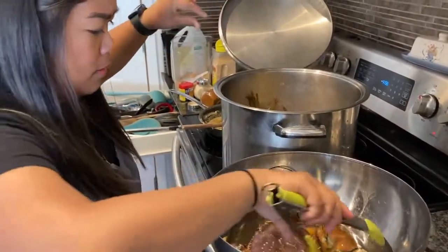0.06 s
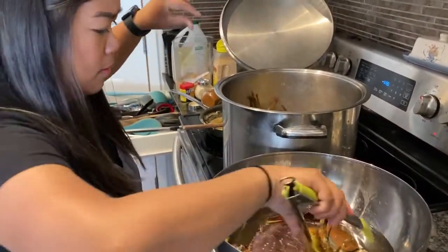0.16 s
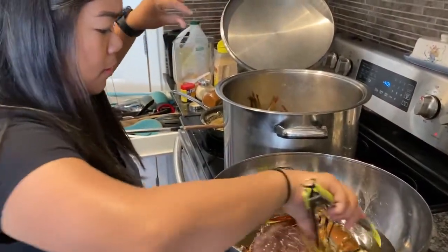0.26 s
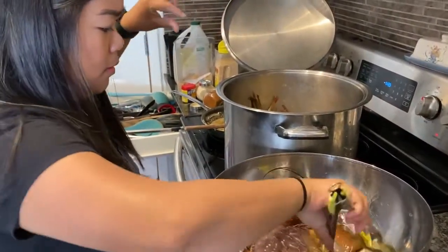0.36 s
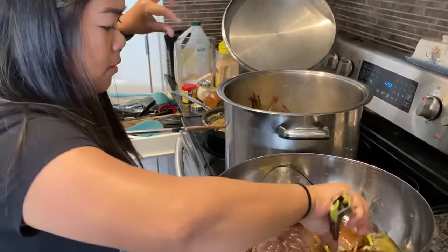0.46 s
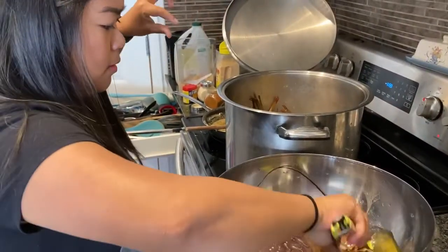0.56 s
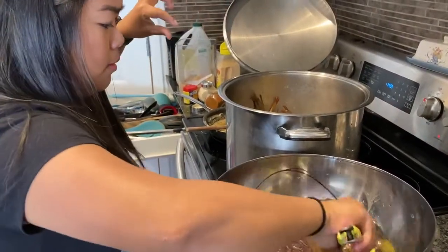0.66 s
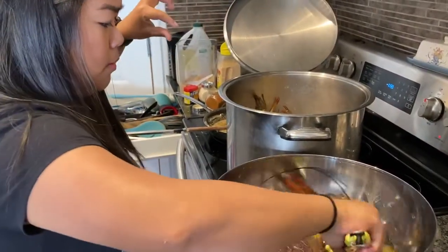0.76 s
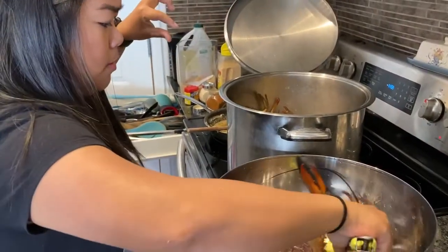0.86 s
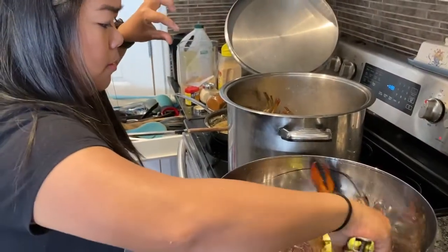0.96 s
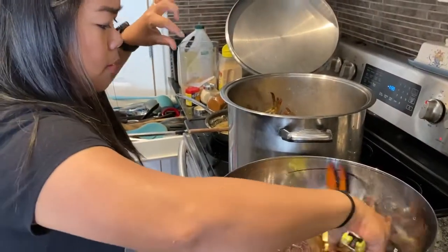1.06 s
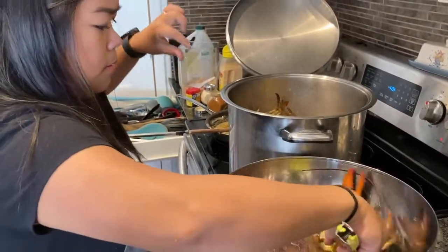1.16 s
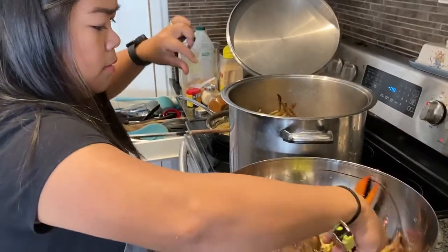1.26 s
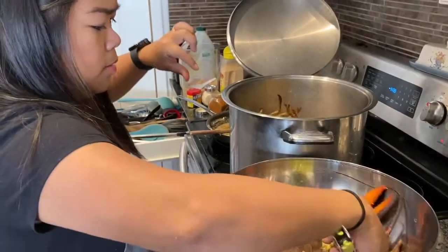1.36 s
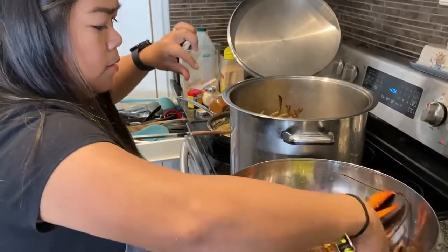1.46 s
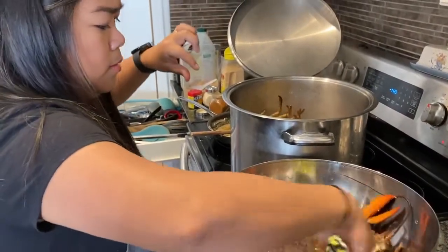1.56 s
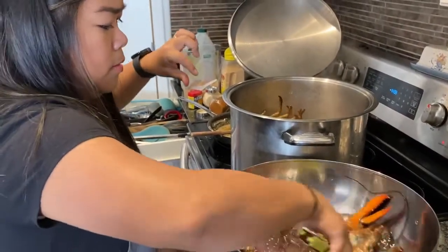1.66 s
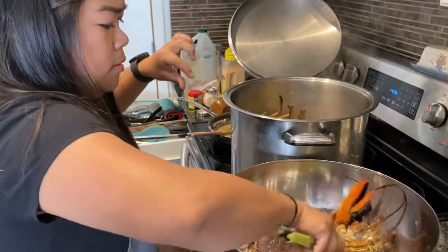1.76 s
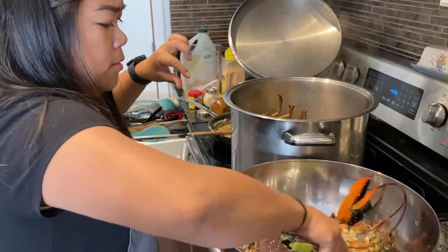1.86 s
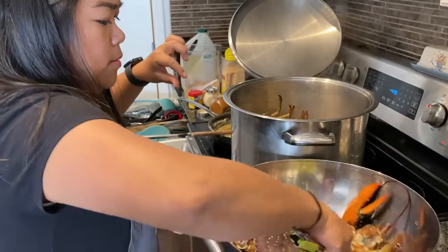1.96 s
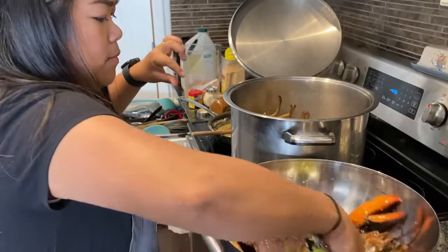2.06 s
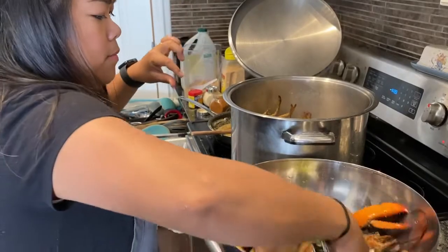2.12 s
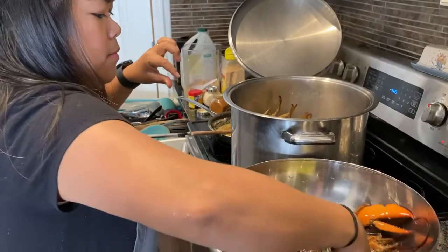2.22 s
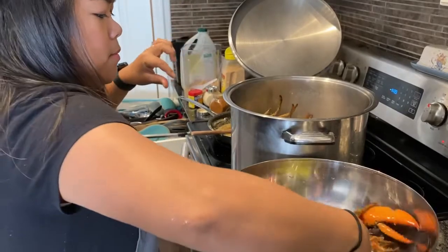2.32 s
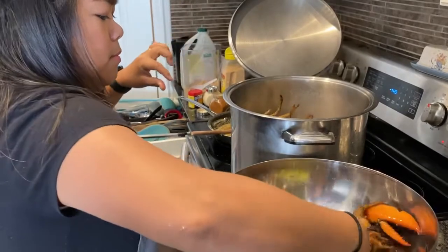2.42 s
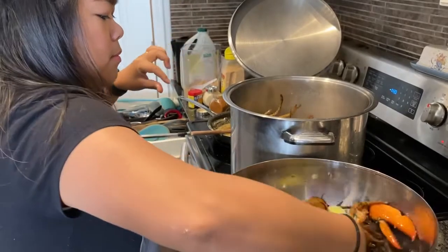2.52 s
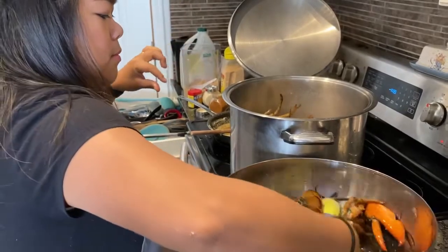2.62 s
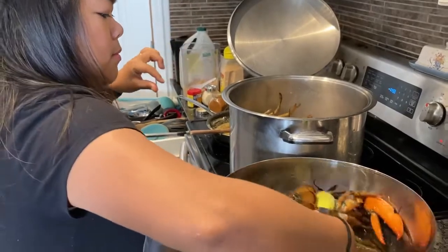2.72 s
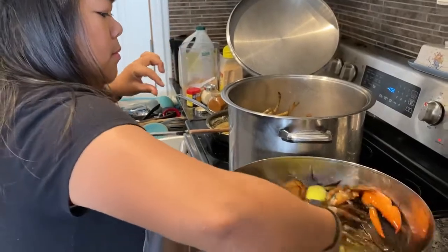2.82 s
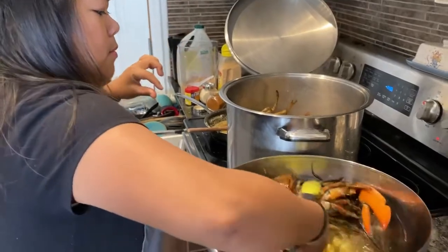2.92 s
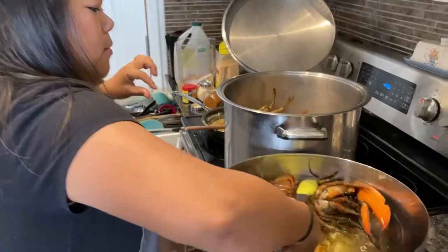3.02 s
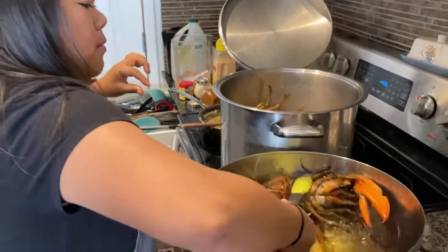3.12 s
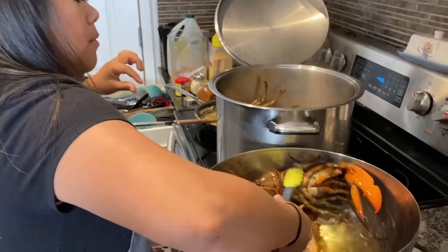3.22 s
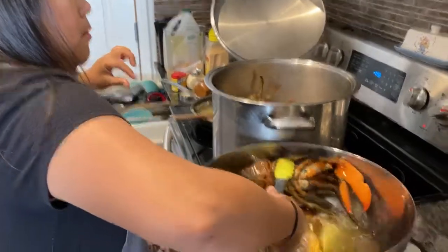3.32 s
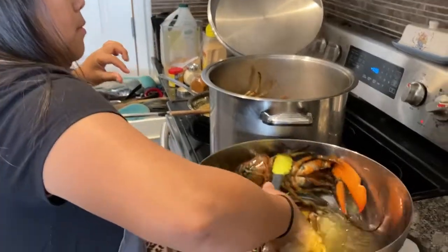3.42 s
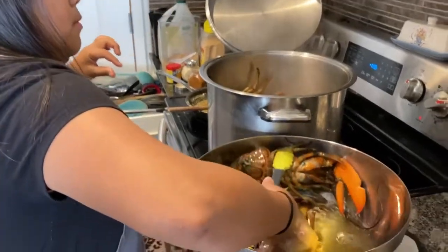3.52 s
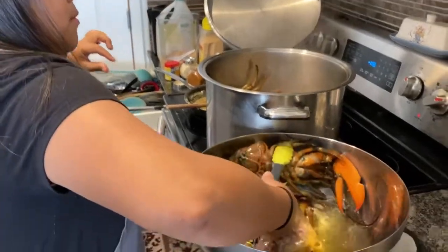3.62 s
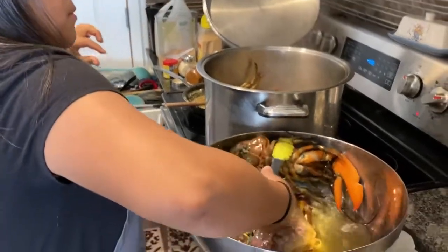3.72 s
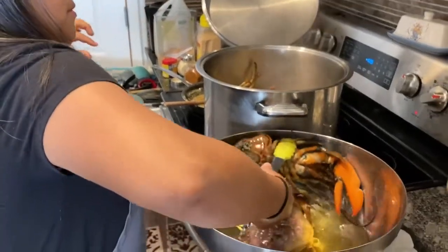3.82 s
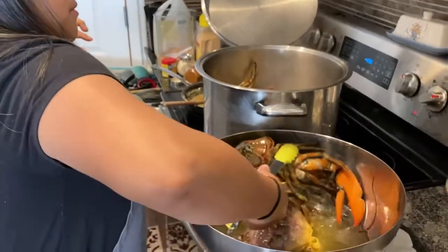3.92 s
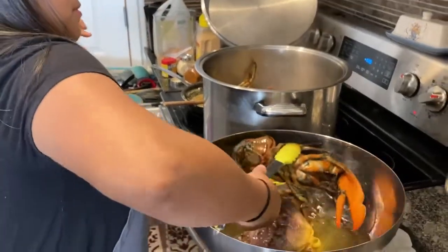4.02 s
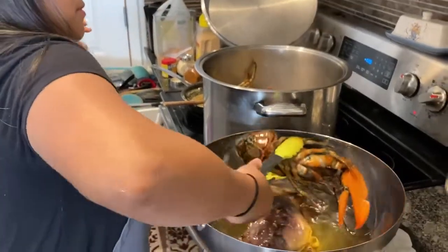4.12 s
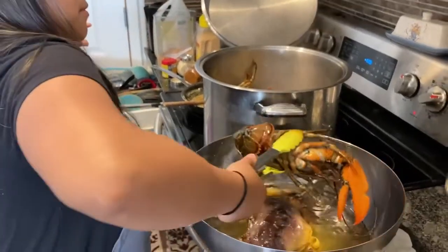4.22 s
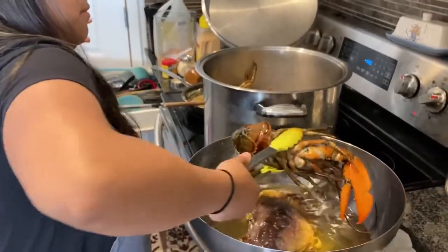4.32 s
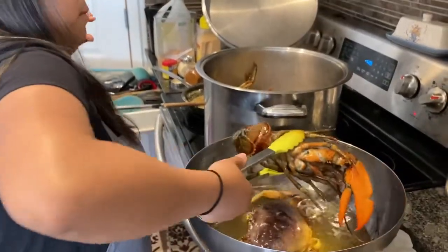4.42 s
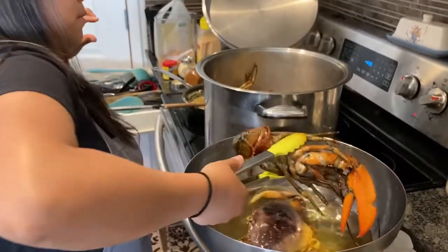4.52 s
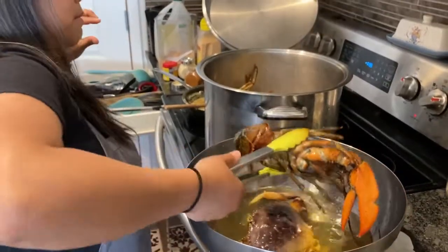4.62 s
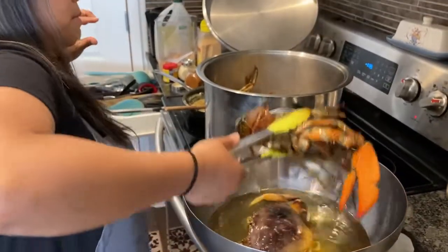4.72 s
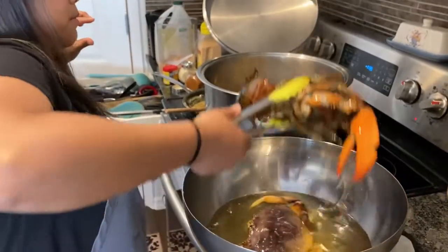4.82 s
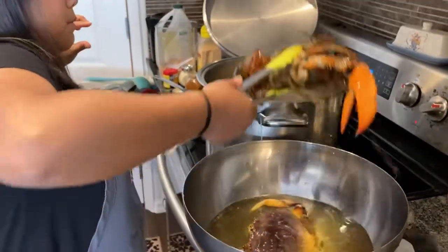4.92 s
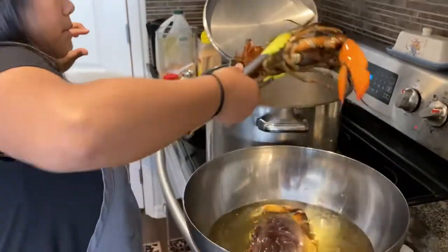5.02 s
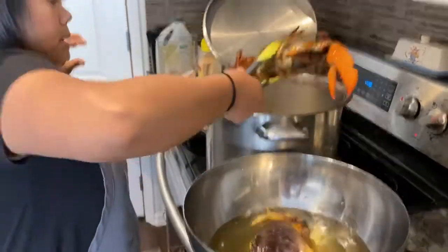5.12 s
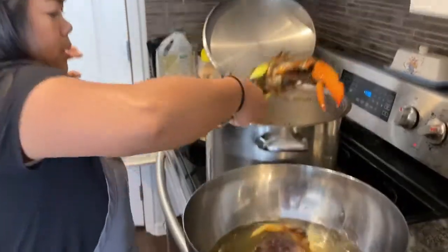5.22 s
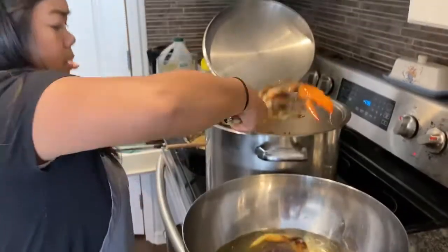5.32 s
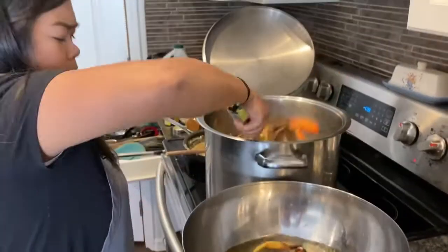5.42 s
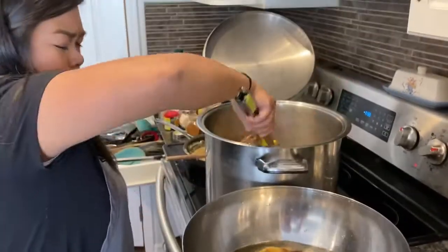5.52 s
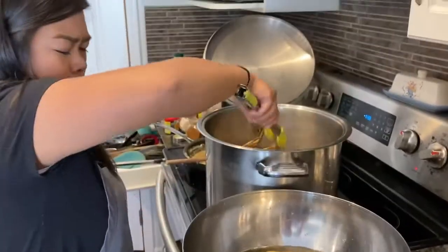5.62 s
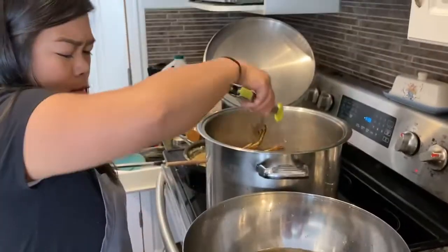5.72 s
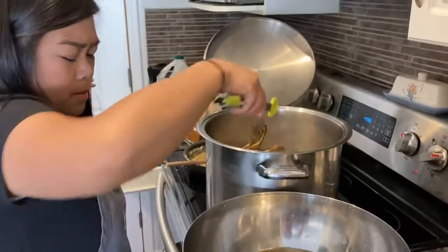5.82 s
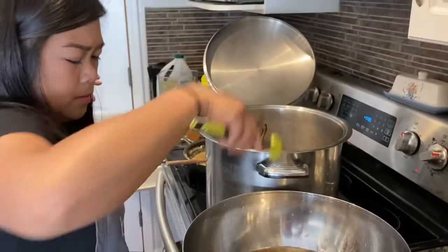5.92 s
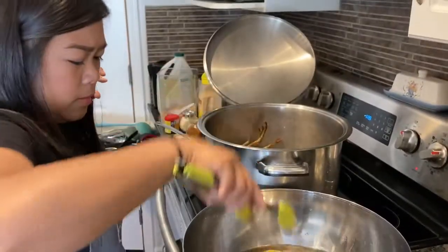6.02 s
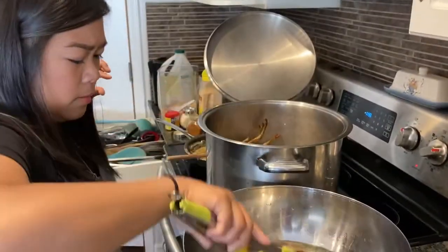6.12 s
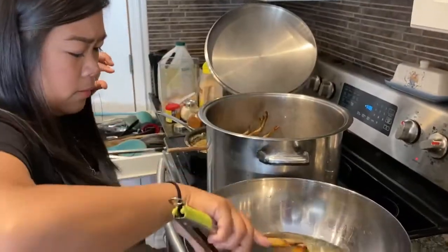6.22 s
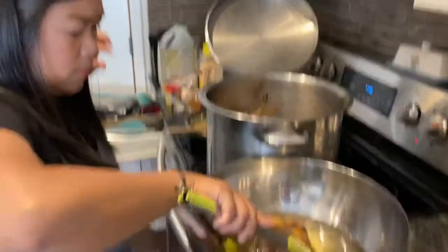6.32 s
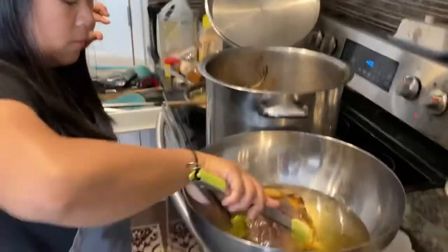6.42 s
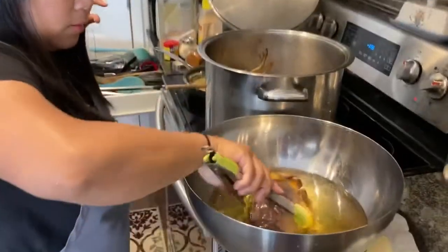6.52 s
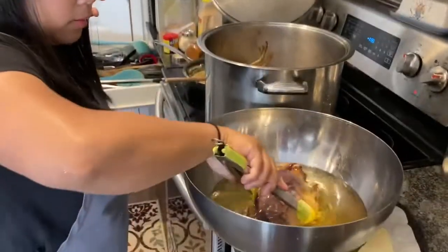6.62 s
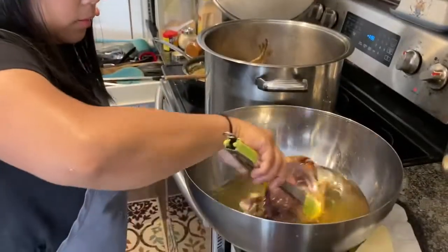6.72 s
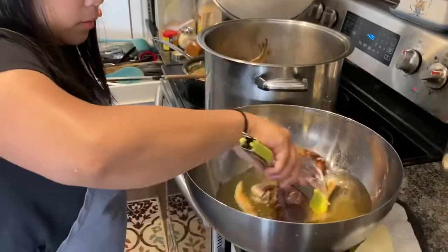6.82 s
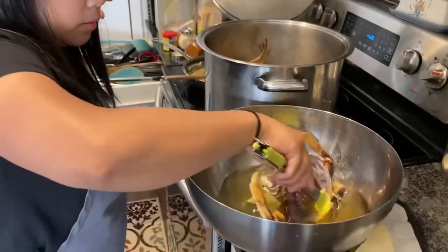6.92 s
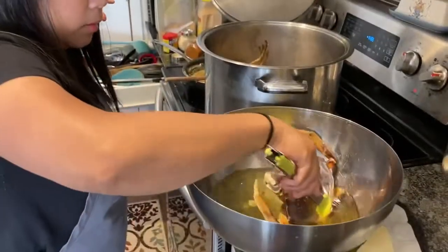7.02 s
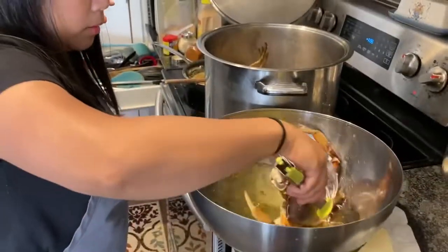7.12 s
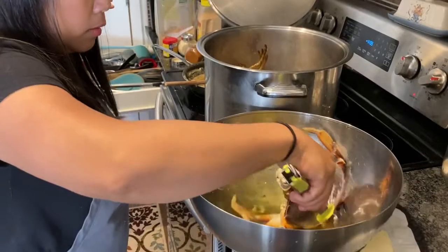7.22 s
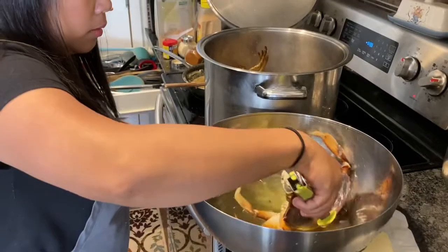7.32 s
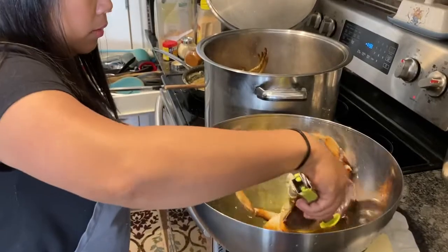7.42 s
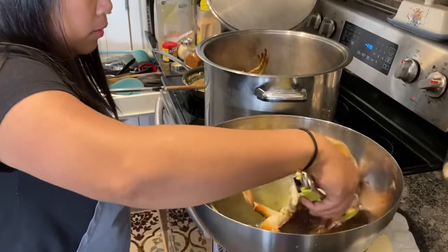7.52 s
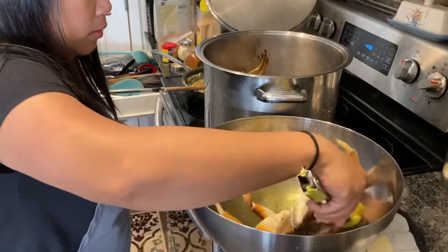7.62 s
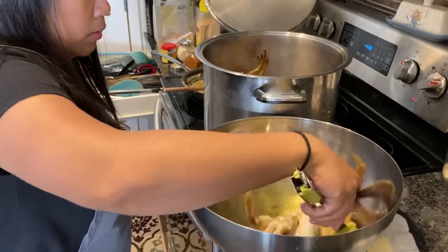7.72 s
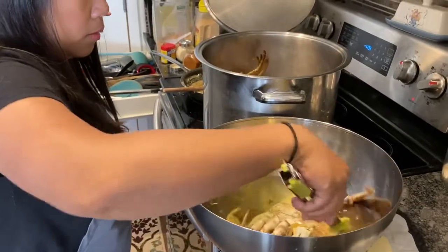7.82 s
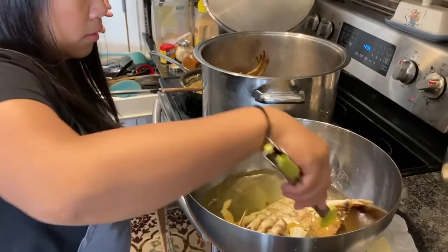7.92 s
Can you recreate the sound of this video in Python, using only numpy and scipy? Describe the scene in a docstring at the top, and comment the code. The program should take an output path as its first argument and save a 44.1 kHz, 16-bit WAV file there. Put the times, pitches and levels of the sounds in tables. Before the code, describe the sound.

A small kitchen heard close by in stereo, with a faint steady low appliance hum and short reflections from the walls. From 0 to 3.6 s tongs and hard crab shells tick, rub and knock on a wet steel bowl: a sharp clack near 0.2 s, swishing scrapes around 1.6, 2.0 and 2.5 s, and a denser clatter at 2.5-2.9 s, with shallow water sloshing and gurgling. The movement dies away; from 3.7 to 4.3 s drops plink brightly into the water, with a few more fine drips until 5 s. At 5.2-5.5 s the crab tumbles into a tall pot, a hollow ringing metal clatter with scraping. It is almost quiet, with tiny drips, until 6.3 s. Then scraping and clacking return in the bowl, loudest at 7.4-7.5 s, with another harsh scrape and glugging knocks at 7.6-7.8 s.

```python
"""Over a low appliance hum, tongs and hard shells clack and rub on a steel bowl.
A kitchen, close to a phone with two microphone ports; shallow water sloshes and gurgles in the bowl.
One shell is lifted, drips, and tumbles into a tall pot; then the chase round the bowl resumes.
Rubbing, water and hum are shaped noise and damped grains; knocks are noise bursts ringing steel modes.
Drops and glugs are gliding tones. The walls answer knocks and water briefly."""
import sys
import numpy as np
from scipy import signal
from scipy.fft import rfft, irfft, next_fast_len
from scipy.io import wavfile
from scipy.ndimage import uniform_filter1d

SR = 44100
rng = np.random.default_rng(int(sys.argv[2]) if len(sys.argv) > 2 else 0)


def master(y):
    """Save y as 16-bit WAV."""
    cut = np.clip(np.atleast_2d(y).T, -1, 1)
    pcm = np.round(cut * 32767)  # scale
    wavfile.write(sys.argv[1], SR, pcm.astype(np.int16))


N = 351036  # samples


def amp(db):
    """Gain of a level in dB."""
    return 10 ** (np.asarray(db) / 20)


def unit(x):
    """x at rms 1."""
    return x / np.sqrt(np.mean(x ** 2) + 1e-20)


def noise(n):
    """White noise, n samples."""
    return rng.standard_normal(n)


def flutter(n, size):
    """Slow random movement of rms 1: noise averaged over size samples."""
    return unit(uniform_filter1d(noise(n), size=size))


def onset(t, rise_s):
    """Exponential rise from 0 to 1."""
    return 1 - np.exp(-t / rise_s)


def along(points, hz):
    """Interpolates (frequency [Hz], value) points on a log frequency axis."""
    f, v = np.transpose(points)
    return np.interp(np.log(hz + 1), np.log(f + 1), v)


def curves(rows):
    """One value per sample for each column after the time."""
    s, *cols = np.transpose(rows)
    return [np.interp(np.arange(N) / SR, s, c) for c in cols]


def law(usual_db, slope, over_db):
    """Level of a layer whose control stands over_db above its usual value."""
    return usual_db + slope * over_db


def filtered(x, response):
    """x times a complex response of frequency."""
    n = x.shape[-1]
    m = next_fast_len(n + 4096)
    return irfft(rfft(x, m) * response(np.fft.rfftfreq(m, 1 / SR)), m)[..., :n]


def band(hz, centre_hz, width_hz):
    """A causal resonance, gain 1 at its centre."""
    return 1j * hz * width_hz / (centre_hz ** 2 - hz ** 2 + 1j * hz * width_hz)


def add(track, s, sound, pan_db):
    """Lays a sound into a stereo track at s seconds, the left louder by pan_db."""
    part = track[:, round(s * SR):][:, :sound.shape[-1]]
    part += sound[..., :part.shape[1]] * amp([[pan_db / 2], [-pan_db / 2]])


# how alike the two ports hear diffuse sound: (frequency [Hz], likeness [0-1])
LIKENESS = [(100, 0.98), (350, 0.81), (700, 0.036), (1300, 0.14), (3000, 0.11), (5000, 0.05)]


def stereo_angle(hz):
    """Mixing angle between mid and side noise that gives the likeness of the ports."""
    return np.arccos(np.clip(along(LIKENESS, hz), -1, 1)) / 2


def rush(spectrum, patchy_db, grit_db):
    """Stereo noise of rms 1 with random patches in time and pitch; grit makes millisecond lumps."""
    z = signal.stft(rng.standard_normal((2, N)), nperseg=256)[2]
    field = uniform_filter1d(rng.standard_normal(z.shape[1:]), size=4, axis=0)
    field = unit(uniform_filter1d(field, size=10, axis=1))
    pair = signal.istft(z * amp(patchy_db * field), nperseg=256)[1][:, :N]
    pair = pair * amp(grit_db * flutter(N, 120))

    def colour(hz):
        angle = stereo_angle(hz)
        return amp(along(spectrum, hz)) * [np.cos(angle), np.sin(angle)]

    mid, side = filtered(pair, colour)
    return unit(np.array([mid + side, mid - side]))


def crackle(count, centre_hz, spread, cycles, uneven_db):
    """Scattered short damped tones of rms 1: legs ticking and small bubbles bursting."""
    when, pitch, size, side = rng.random((count, 4)).T
    hz = centre_hz * np.exp(spread * (2 * pitch - 1))[:, None]
    k = np.arange(SR // 50)
    tones = np.sin(2 * np.pi * hz * k / SR) * np.exp(-hz * k / SR / cycles)
    grains = amp(-uneven_db * np.log(size + 0.007))[:, None] * tones
    index = ((when * N).astype(int)[:, None] + k).ravel()
    ports = [np.bincount(index, (grains * (0.65 + gain)[:, None]).ravel(), N)[:N]
             for gain in (side, 1 - side)]
    return unit(np.array(ports))


# colour of the appliance: (frequency [Hz], density [dB per Hz])
HUM_COLOUR = [(25, -16.5), (60, 2.5), (150, 2), (260, 1), (340, 0.5), (450, -15.5), (700, -5.5),
              (1200, -17.5), (3000, -27), (8000, -43.5), (15500, -46.5)]


def hum():
    """A low appliance hum: steady noise, strongest between about 60 and 340 Hz."""
    return amp(-64.5) * rush(HUM_COLOUR, patchy_db=1.0, grit_db=-2.0)


# shells dragged over wet steel: (time [s], rubbing [dB], stirring of the water [dB])
DRAG_MOVES = [(0, -78, -66), (.16, -78, -63.5), (.29, -55, -57), (.5, -61, -59.5), (.62, -56.5, -63.5),
              (.75, -63, -70), (.93, -68.5, -61.5), (1.0, -53, -59.5), (1.14, -58.5, -57),
              (1.3, -57, -56.5), (1.46, -68.5, -66.5), (1.57, -48, -49), (1.68, -60, -60),
              (1.85, -60.5, -58.5), (1.99, -46.5, -58.5), (2.14, -70, -67.5), (2.31, -70, -63.5),
              (2.44, -52, -55), (2.56, -45, -56.5), (2.66, -52.5, -50.5), (2.83, -42.5, -47),
              (2.94, -60.5, -57.5), (3.07, -61, -58), (3.28, -59.5, -61.5), (3.44, -71, -65.5),
              (3.65, -83, -63), (3.92, -83, -74.5), (4.2, -75, -73.5), (4.41, -79, -63), (4.51, -88, -80),
              (4.92, -84, -81), (5.1, -103, -66), (5.26, -49, -59.5), (5.38, -32.5, -48.5),
              (5.58, -46.5, -49), (5.75, -64.5, -60), (6.06, -75.5, -75.5), (6.28, -101.5, -63.5),
              (6.32, -55, -50), (6.46, -59, -64), (6.64, -53.5, -58), (6.82, -64, -60.5), (7.0, -47, -60.5),
              (7.15, -48, -62), (7.3, -60, -63), (7.41, -36.5, -46.5), (7.54, -41, -50),
              (7.68, -31.5, -49.5), (7.8, -45, -49.5), (7.96, -55, -54)]
# slow changes of the mix, added to the laws:
# (time [s], thin legs on the steel [dB], air under the shells [dB], weight on the bowl [dB])
DRAG_MIX = [(0, 7, 10.5, 3), (.3, -5, 4, 9.5), (.55, -0.5, 1, -1.5), (.8, 0, 2, 1), (1.1, 6, 5, 1.5),
            (1.35, -1.5, -5, 0), (2.0, -1, -10, 1.5), (2.3, 5, -19, -5), (2.45, 0, 15, 3),
            (2.62, -4.5, 4, 1), (2.8, -7, -3, -9), (3.0, 4.5, 12, 0), (3.3, -0.5, 10, -1.5),
            (3.7, 12, 7.5, 2.5), (4.1, -6, 1, -0.5), (5.2, -16.5, 1.5, 1), (5.8, -19.5, -5, 2),
            (6.3, -9, -5, -1.5), (6.7, -5, 9, 1.5), (7.1, -6, -1, -3), (7.5, -1, 6, -4),
            (7.96, -5.5, -7, 3.5)]
# colours of the rubbing, the water, and the finest treble: (frequency [Hz], density [dB per Hz])
SCRAPE_COLOUR = [(1500, -21.5), (2300, -3.5), (3200, 1), (4200, -4.5), (6000, -7.5), (8000, -14)]
SLOSH_COLOUR = [(600, -17), (950, -23.5), (1300, -13.5), (2200, -15), (3200, -36)]
SIZZLE_COLOUR = [(6500, -24.5), (8000, -23), (11000, -8), (14000, -28.5), (16000, -17.5)]
# thin legs skating: (frequency [Hz], density [dB per Hz])
HISS_COLOUR = [(3300, -31), (4100, -7.5), (4800, 2), (5400, -5), (6500, -3), (8000, -10.5), (9500, -36.5)]
# air under the shells in the water: (frequency [Hz], density [dB per Hz])
GURGLE_COLOUR = [(400, -17.5), (560, -5.5), (700, 11), (820, 11), (1000, -9.5), (1300, -6.5), (1700, -25)]
# the bowl shifting on the counter: (frequency [Hz], density [dB per Hz])
ROCK_COLOUR = [(25, -24.5), (50, 3.5), (130, -6.5), (220, 4), (320, -0.5), (450, -8), (600, -29.5)]


def drag():
    """Legs and tongs rub the steel, stir the water and rock the bowl; each layer follows by its own law."""
    rub, stir = np.array(curves(DRAG_MOVES)) + 60  # dB over a middling movement at -60 dB
    legs, air, weight = curves(DRAG_MIX)
    scrape_db = law(-63.5, 0.83, rub)
    hiss_db = law(-61.5, 0.86, rub) + legs
    sizzle_db = law(-68.5, 0.49, rub)
    slosh_db = law(-63.5, 1.32, stir)
    gurgle_db = law(-70, 0.61, stir) + air
    rock_db = law(-62, 0.43, stir) + weight
    bubbles = crackle(count=2600, centre_hz=1100, spread=0.75, cycles=5.4, uneven_db=4.0)
    leg_ticks = crackle(count=2600, centre_hz=4080, spread=0.628, cycles=6, uneven_db=2.4)
    return (amp(scrape_db) * rush(SCRAPE_COLOUR, patchy_db=5.0, grit_db=0.0)
            + amp(hiss_db) * rush(HISS_COLOUR, patchy_db=4.5, grit_db=0.5)
            + amp(slosh_db) * rush(SLOSH_COLOUR, patchy_db=2.5, grit_db=-0.5)
            + amp(sizzle_db) * rush(SIZZLE_COLOUR, patchy_db=8.0, grit_db=1.0)
            + amp(slosh_db - 5.0) * bubbles
            + amp(scrape_db - 7.5) * leg_ticks
            + amp(gurgle_db) * rush(GURGLE_COLOUR, patchy_db=2.0, grit_db=-0.5)
            + amp(rock_db) * rush(ROCK_COLOUR, patchy_db=0.0, grit_db=-1.2))


OWN_SHARE = 0.45  # what differs between the ports, over what they share


def contact(t, life, hard, clack_db, crack_db, shell_hz, shell_db):
    """A hard first touch and chatter, coloured by the shell; a brighter tick fades at its own pace."""
    n = len(t)
    rise_s = 0.0017 * amp(-0.74 * hard)  # softer contacts rise more slowly
    shape = amp(-60 * t / np.clip(life, .004, .3)) * onset(t, rise_s)
    # after the first touch the shell chatters in lumps a few milliseconds long
    shape = shape * (amp(2.14 * flutter(n, 130)) + np.exp(-t / 0.0071))
    push = 3.6 * (np.arange(n) == SR // 1000)  # the first touch as one sharp push

    def colour(f):
        return (1.16 * band(f, 3225, 2000) ** 2
                + 2.0 * amp(clack_db) * band(f, 1690, 1900) ** 2
                + 0.99 * amp(crack_db) * band(f, 4570, 2000) ** 2
                + amp(shell_db) * band(f, shell_hz, shell_hz / 8.85))

    # the curved wall sends each port its own share of the chatter
    chatter = noise(n) + OWN_SHARE * noise(n) * [[1], [-1]]
    body = filtered(shape * chatter + push, colour)
    tick_gain = 1.19 * amp(law(-13.5, 1.49, hard))
    tick = (0.53 * shape ** 0.31 + 1.17 * shape ** 0.92) * noise(n)
    return body + filtered(tick, lambda f: tick_gain * band(f, 9290, 8300) ** 2)


def vessel_ring(t, modes, db, low_db, clack_db, crack_db, blur):
    """Decaying steel modes: heavy soft contacts drive the low ones, hard ones the upper."""
    hz, level, t60 = np.transpose(modes)[:, :, None]
    drive = np.select([hz < 500, hz < 2300, hz < 4250], [low_db, clack_db, 0], crack_db)
    drive = drive + rng.normal(0, 5.34, hz.shape)  # strengths change with the spot struck
    drive = drive + (hz > 2300) * (0.33 * (db + 13.0) - 0.5)  # light taps hardly move the upper modes
    # water and shells load the steel, so each mode's phase wanders
    steps = rng.standard_normal((len(hz), len(t) // 8 + 1))
    wander = blur * np.sqrt(hz / SR) * np.cumsum(steps, axis=1)
    phase = 2 * np.pi * hz * t + np.repeat(wander, 8, axis=1)[:, :len(t)]
    ring = amp(level + drive - 60 * t / t60) * np.sin(phase)
    # each port gets its own share of every mode above 500 Hz
    ports = 1 + OWN_SHARE * (hz.T > 500) * rng.uniform(-1, 1, hz.T.shape) * [[1], [-1]]
    return (ports @ ring) * onset(t, 0.0015)


def thud(t, db, hz, base_t60_s):
    """A low damped tone with an unsteady phase; lower thuds last longer."""
    shake = 0.81 * flutter(len(t), 300)  # radians
    fade = amp(db + 16.0 - 60 * t / (base_t60_s + 5.3 / hz))
    return fade * np.sin(2 * np.pi * hz * t + shake - shake[0]) * onset(t, 0.0013)


def knocks(table, modes, ring_db, boom_db, blur, thud_s):
    """Each contact is a rattling burst coloured by the shell, with a thud and the vessel's ringing."""
    out, t = np.zeros((2, N)), np.arange(SR * 2 // 5) / SR
    for s, db, thud_db, thud_hz, treble_db, shell_hz, shell_db, life in table:
        hard = treble_db + 10  # dB over the usual treble; harder trades clack for crack and tick
        clack_db, crack_db = law(-2, -0.49, hard), law(-3.5, 0.47, hard)
        hit = contact(t, life, hard, clack_db, crack_db, shell_hz, shell_db)
        ring = vessel_ring(t, modes, db, thud_db + boom_db, clack_db, crack_db, blur)
        sound = hit + thud(t, thud_db, thud_hz, thud_s) + amp(ring_db) * ring
        add(out, s, amp(db - 7.5) * sound, pan_db=0.8)
    return out


# contacts in the bowl: (time [s], relative level [dB], relative thud [dB], thud pitch [Hz],
# relative treble [dB], shell pitch [Hz], relative shell level [dB], contact t60 [s])
BOWL_CONTACTS = [(0.061, -36.5, -17, 310, -18, 865, 21, 0.021),
                 (0.148, -33, -15.5, 314, -8, 2100, 7, 0.026), (0.23, -17.5, -25, 275, -5, 3600, 0, 0.026),
                 (0.247, -36, -8, 264, -12, 3400, 10, 0.033), (0.265, -34, -23, 231, -10, 2170, 17, 0.042),
                 (0.285, -28, -17, 297, -10, 1330, 4.5, 0.026),
                 (0.462, -50, -11.5, 300, -14, 4850, 19, 0.036),
                 (0.521, -40.5, -37, 292, -9.5, 4960, 7, 0.046),
                 (0.63, -51, -27, 242, -0.5, 1820, 12, 0.25),
                 (0.693, -42.5, -15.5, 220, -8.5, 660, 16, 0.029),
                 (0.712, -47.5, -29, 180, -11, 636, 20, 0.33), (0.873, -50, -26, 217, -18, 1450, 12, 0.069),
                 (0.944, -27, -28, 128, -10.5, 4400, -6, 0.03),
                 (0.971, -40, -15, 251, -3.5, 4230, 10.5, 0.035),
                 (0.9865, -28, -19, 231, -6, 760, 27.5, 0.022), (0.987, -27, -20, 237, -5, 5540, 14, 0.1),
                 (1.085, -39, -20.5, 288, -8.5, 5040, 9, 0.088),
                 (1.123, -43, -25, 246, -6.5, 5100, 18, 0.21),
                 (1.232, -41.5, -11, 124, -12, 3580, -5, 0.22),
                 (1.373, -41.5, -22, 250, -26, 1210, 16, 0.03),
                 (1.437, -49.5, -21, 250, -9, 2880, 11, 0.13),
                 (1.473, -41.5, -30, 298, -11, 2770, 10, 0.29),
                 (1.494, -30, -23, 416, -17, 4100, 11, 0.043),
                 (1.522, -35.5, -27, 263, -1.5, 1590, 17, 0.033),
                 (1.56, -38.5, -13, 400, -5.5, 5400, 13.5, 0.07),
                 (1.578, -40.5, -27, 222, -5, 5250, 17, 0.06), (1.763, -51, -9, 72, 0, 4200, 26.5, 0.029),
                 (1.913, -38.5, -9.5, 309, -20, 4400, 20.5, 0.029),
                 (2.189, -49, -11, 205, -23, 1300, 18.5, 0.087),
                 (2.203, -48.5, -11, 222, -7, 5050, 13.5, 0.11),
                 (2.416, -54, -20, 229, -17, 4400, 27.5, 0.073), (2.436, -50, -22, 151, -18, 720, 14, 0.06),
                 (2.469, -48, -8, 130, -7, 826, 28, 0.17), (2.495, -33.5, -22, 304, -12, 740, 21.5, 0.038),
                 (2.515, -34.5, -13.5, 406, -8, 1140, 19, 0.05),
                 (2.54, -29.5, -24, 135, -23, 1100, 10, 0.045), (2.565, -37, -16, 385, -14, 1750, 12, 0.05),
                 (2.582, -47, -8, 376, -16, 1050, 14, 0.04), (2.634, -39, -33.5, 300, -18, 1650, 14, 0.057),
                 (2.658, -28.5, -23, 372, -8.5, 755, 19, 0.03), (2.7, -41, -20, 250, -12, 1400, 12, 0.05),
                 (2.728, -45, -24, 250, -12, 1350, 17, 0.066),
                 (2.755, -36.5, -26, 250, -13, 1870, 16, 0.044),
                 (2.775, -33, -21, 252, -11, 1250, 20, 0.079), (2.791, -27, -29, 495, -16, 1450, 20, 0.044),
                 (2.799, -18.5, -18.5, 139, -23, 4850, 24.5, 0.021),
                 (2.805, -26, -16.5, 140, -8, 1300, 20.5, 0.032),
                 (2.822, -44, -19, 135, -16, 1200, 16, 0.04), (2.873, -32, -23, 95, -8, 2550, 23, 0.015),
                 (2.896, -30.5, -21, 305, -8.5, 680, 23, 0.027),
                 (2.988, -38, -18.5, 260, -9.5, 804, 8, 0.039),
                 (3.032, -32.5, -24.5, 210, -8.5, 1320, 10, 0.098),
                 (3.099, -32.5, -25, 174, -11, 1340, 10, 0.14),
                 (3.256, -29.5, -33, 67.3, -8, 5060, 8, 0.082),
                 (3.441, -39, -19.5, 184, -9, 1340, 6, 0.059), (3.614, -44, -14, 241, -10, 3860, -19, 0.35),
                 (6.291, -28, -31, 296, -23, 1920, 3, 0.1), (6.3, -33, -18, 301, -20, 3500, 15, 0.036),
                 (6.384, -30, -24, 366, -5, 1330, 15, 0.023), (6.396, -29.5, -18, 392, -19, 1900, 9, 0.058),
                 (6.406, -40, -19.5, 302, -16, 3400, 17.5, 0.035),
                 (6.477, -36, -18.5, 247, -6, 1410, 19.5, 0.024),
                 (6.506, -51.5, -3, 218, 4.5, 5820, 3, 0.047), (6.544, -40, -18, 211, -9, 2050, 0, 0.35),
                 (6.657, -27, -14, 204, -6, 3570, -7, 0.043), (6.675, -48, -3, 245, -14, 600, 18, 0.041),
                 (6.758, -40.5, -6.5, 237, -10, 5800, 14, 0.066),
                 (6.803, -31.5, -17.5, 230, -8.5, 3070, 8, 0.057),
                 (6.828, -23, -27, 293, -3, 1780, 11, 0.01), (6.834, -34, -25, 293, -3, 5070, 15, 0.054),
                 (6.878, -43.5, -13, 318, -1.5, 3660, 20, 0.072),
                 (7.008, -47, -34, 141, -17, 2000, 8, 0.024),
                 (7.012, -22.5, -34, 139, -7.5, 1490, -0.5, 0.027),
                 (7.037, -46, -9, 121, -7, 3820, 21, 0.05), (7.107, -33, -25, 125, -9, 2570, 10, 0.039),
                 (7.158, -38.5, -18.5, 400, -10, 4400, 11, 0.1),
                 (7.167, -35, -30, 300, -2, 4460, 14.5, 0.046),
                 (7.176, -32, -26, 306, -3, 5500, 11.5, 0.037),
                 (7.187, -36.5, -15, 74, -8, 695, 15.5, 0.043), (7.21, -53.5, 6, 63, -8, 5250, 6, 0.045),
                 (7.293, -47, -13, 303, -7, 4200, 16, 0.027), (7.353, -33, -27, 253, -9.5, 2780, -4, 0.15),
                 (7.385, -37.5, -23, 393, -0.5, 4230, 12, 0.065),
                 (7.4, -32, -8.5, 333, -7, 740, 22.5, 0.041),
                 (7.416, -23.5, -22, 257, -17, 4200, 11, 0.055),
                 (7.433, -20.5, -37, 382, -10, 4440, 10, 0.084),
                 (7.44, -10.5, -41, 75.4, -2.5, 4700, -19, 0.074),
                 (7.4455, -4, -46, 131, -21, 1227, 21, 0.019), (7.453, -9, -58, 135, -12, 1210, -1, 0.08),
                 (7.468, -14.5, -36, 212, -16, 1100, 8, 0.08), (7.472, -19, -42, 200, -3, 6700, 1, 0.045),
                 (7.479, -19.5, -34, 61.9, -5, 4300, 15, 0.025),
                 (7.487, -32, -38.5, 200, -16, 2750, 10, 0.03),
                 (7.503, -28.5, -42, 200, -22, 2590, 23, 0.067),
                 (7.612, -19, -31, 302, -7.5, 4260, -13, 0.019),
                 (7.637, -34, -17, 200, -0.5, 3600, 9, 0.066), (7.673, -21, -21.5, 314, 3, 5100, 19, 0.062),
                 (7.678, -23, -31, 302, -2.5, 5600, 22, 0.043), (7.682, -25, -35, 298, -1, 6100, 22, 0.042),
                 (7.689, -38, -35, 300, -2, 6800, 14, 0.05), (7.721, -13.5, -16.5, 397, -7, 5200, 7, 0.04),
                 (7.729, -23, -20, 326, -6, 3500, 15, 0.036),
                 (7.744, -33.5, -3.5, 113, -14, 1700, 24, 0.045),
                 (7.766, -25, -10, 441, -11.5, 860, 14, 0.16),
                 (7.796, -22.5, -26, 278, -5.5, 1880, 17, 0.047)]
# modes of the steel bowl: (frequency [Hz], relative level [dB], t60 [s])
BOWL_MODES = [(55, -5, 0.13), (128, 4.5, 0.26), (288, 5, 0.42), (676, -5, 0.045), (1082, -4, 0.1),
              (1284, 2, 0.036), (1442, -7.5, 0.056), (2100, -6.5, 0.13), (2470, -7, 0.13),
              (2620, -12, 0.24), (2780, -2.5, 0.11), (3480, -5, 0.076), (4200, -17, 0.12), (4350, -1, 0.14),
              (4700, -7, 0.079), (5221, -16, 0.067), (5530, -5, .08), (6200, -12, 0.22), (6670, 0, 0.22),
              (7494, -14, 0.19), (8000, -10, .1)]


def bowl_knocks():
    """Shells and tongs clack on the steel bowl, exciting its modes."""
    return knocks(BOWL_CONTACTS, BOWL_MODES, ring_db=-13.0, boom_db=5.5, blur=0.87, thud_s=0.055)


# the walls' answer: (frequency [Hz], t60 [s])
KITCHEN_DECAY = [(100, 0.36), (1000, 0.22), (5000, 0.27), (14000, 0.18)]


def kitchen(x):
    """Each frequency of the walls' answer dies at its own speed; long waves reach both ports alike.
    A fresh random echo tail is drawn for every tenth of a second."""
    step, out = SR // 10, np.zeros((2, N + SR))
    tail_noise = rng.standard_normal((N // step + 1, 2, SR // 2))
    hz, t, z = signal.stft(tail_noise, SR, nperseg=256)
    angle = stereo_angle(hz)[:, None]
    mid, side = z[:, 0] * np.cos(angle), z[:, 1] * np.sin(angle)
    fade = amp(-60 * t / along(KITCHEN_DECAY, hz)[:, None])
    tails = signal.istft(np.array([mid + side, mid - side]) * fade, SR, nperseg=256)[1]
    tails = tails / np.sqrt(np.mean(np.sum(tails ** 2, axis=2)))
    for k in range(tails.shape[1]):
        piece = x.mean(0)[None, k * step:(k + 1) * step]
        answer = signal.fftconvolve(piece, tails[:, k], axes=1)
        out[:, k * step + 200:][:, :answer.shape[1]] += answer  # 200 samples: 4.5 ms late
    return out[:, :N]


# pockets of air escaping under a shell:
# (time [s], relative level [dB], first pitch [Hz], last pitch [Hz], length [s])
AIR_POCKETS = [(0.683, -56, 612, 656, 0.031), (0.755, -56.5, 622, 635, 0.025),
               (0.795, -53.5, 600, 636, 0.017), (2.731, -42.5, 1050, 1321, 0.13),
               (3.24, -51, 792, 750, 0.053), (6.671, -45.5, 428, 235, 0.045),
               (7.717, -32.5, 484, 144, 0.039), (7.767, -37.5, 705, 1050, 0.02),
               (7.783, -34.5, 1006, 1870, 0.012)]


def glugs():
    """An escaping air pocket is a tone sliding up or down, fluttering in pitch and level."""
    out = np.zeros((2, N))
    for s, db, first_hz, last_hz, length in AIR_POCKETS:
        u = np.arange(0, 1, 1 / (length * SR))
        shake = flutter(len(u), 70)
        pitch = first_hz * (last_hz / first_hz) ** u * (1 + 0.096 * shake)
        swell = amp(db + 3.5 * shake) * np.sin(np.pi * u) ** 0.43
        add(out, s, swell * np.sin(2 * np.pi * np.cumsum(pitch) / SR), pan_db=0)
    return out


# drops from the lifted shell:
# (time [s], relative level [dB], bubble pitch [Hz], bubble t60 [s], relative splash [dB])
DROPS = [(3.71, -47, 1030, 0.024, -15), (3.732, -51, 4950, 0.024, -21), (3.779, -54, 4980, 0.04, -12),
         (3.809, -45, 2860, 0.011, -1), (3.817, -47, 5060, 0.0081, 6.5), (3.834, -56.5, 4030, 0.018, 15),
         (3.876, -39, 2250, 0.024, 8), (3.891, -51, 7860, 0.006, 2), (3.988, -57, 4200, 0.012, 5),
         (4.007, -42.5, 1945, 0.059, -5), (4.024, -42, 7300, 0.0032, -5), (4.036, -27.5, 1867, 0.026, -5),
         (4.039, -33, 3190, 0.0078, -15), (4.116, -35, 10650, 0.0063, 0.5), (4.137, -57, 4470, 0.015, 8),
         (4.046, -41, 2290, 0.02, -15), (4.162, -28.5, 2177, 0.02, -10), (4.172, -42.5, 2980, 0.024, -20),
         (4.197, -43, 2100, 0.03, -9), (4.214, -55, 2260, 0.034, -12), (4.22, -60, 6760, 0.014, -5),
         (4.237, -43, 10500, 0.0038, -18), (4.272, -38.5, 10700, 0.0076, -11),
         (4.568, -36.5, 7400, 0.011, -9.5), (4.725, -71.5, 8200, .005, 23), (4.8, -58, 5030, 0.007, 0),
         (4.921, -36.5, 9860, 0.013, -22), (4.926, -44, 7450, 0.011, -10), (4.935, -50.5, 2650, 0.056, -15),
         (4.952, -59, 10500, .005, -14), (4.955, -46, 4450, 0.0051, -14), (4.976, -32, 10900, 0.0048, -9),
         (4.996, -52, 5560, 0.016, 12.5), (5.762, -55, 7500, 0.014, -10), (5.828, -53.5, 8100, .006, 6),
         (5.868, -60, 6570, 0.019, 11)]
# the open bowl sings on after a drop near these pitches: (pitch [Hz], width [Hz], relative level [dB])
BOWL_HOLLOW = [(1770, 130, -6.5), (2226, 130, -2)]


def hollow_song(t, drop_hz):
    """The bowl's hollow as narrow fluttering noise, stronger when the drop is near its pitch."""
    song = np.zeros(len(t))
    for centre, width, level in BOWL_HOLLOW:
        nearness = abs(band(drop_hz, centre, 0.31 * centre)) ** 2
        tone = unit(filtered(noise(len(t)), lambda f: band(f, centre, width) ** 2))
        song += amp(level) * nearness * tone
    return song * amp(-22 - 60 * t / 0.32) * onset(t, 0.0067)


def drips():
    """A drop splashes and leaves a bubble of rising pitch; the bowl's wall throws it back at once
    and its hollow sings on."""
    out, t = np.zeros((2, N)), np.arange(SR // 4) / SR
    for s, db, hz, life, splash_db in DROPS:
        # the pitch climbs by 12.6 % of its start in each bubble t60
        phase = 2 * np.pi * hz * (t + 0.063 * t * t / life) + 0.42 * flutter(len(t), 90)
        bubble = np.sin(phase) * amp(-60 * t / np.clip(life, .002, .2)) * onset(t, 3 / hz)
        splash = amp(splash_db - 60 * t / 0.041) * onset(t, 0.0013) * noise(len(t))
        splash = filtered(splash, lambda f: band(f, 1.05 * hz, 0.4 * hz) ** 2 + 0.17)
        add(out, s, amp(db) * (bubble + hollow_song(t, hz) + splash), pan_db=0)
        add(out, s + 0.0054, amp(db - 11.5) * bubble, pan_db=0)  # thrown back by the wall
    return out


# contacts in the pot: (time [s], relative level [dB], relative thud [dB], thud pitch [Hz],
# relative treble [dB], shell pitch [Hz], relative shell level [dB], contact t60 [s])
POT_CONTACTS = [(5.204, -27, -13, 364, -14.5, 1750, 10, 0.075),
                (5.243, -40, -10.5, 163, -7.5, 3300, 4.5, 0.14),
                (5.291, -40.5, -15, 352, -10, 3950, 4.8, 0.32),
                (5.318, -12.5, -28.5, 170, -8, 4260, 1.3, 0.08),
                (5.334, -23.5, -15.5, 140, 3.5, 1250, 3.6, 0.06),
                (5.347, -22, -27, 170, -11.5, 7000, 6.7, 0.16), (5.36, -24, -32, 164, -1.5, 715, 4, 0.047),
                (5.401, -18.5, -18.5, 357, -19, 652, 21.3, 0.038),
                (5.442, -23, -18.5, 178, 1, 3300, 5, 0.054),
                (5.447, -11.5, -29.5, 364, -9.5, 1895, 13.8, 0.052),
                (5.452, -16, -18.5, 164.5, -10.5, 3000, 5.9, 0.029),
                (5.457, -20.5, -17, 354, -20, 707, 16, 0.046)]
# modes of the tall pot: (frequency [Hz], relative level [dB], t60 [s])
POT_MODES = [(49.9, -12.5, 0.39), (68, -16, 0.5), (163.9, -6.5, 0.35), (367, -0.5, 0.21), (589, -13, 0.2),
             (669, -4, 0.18), (900, -13.5, 0.1), (1080, -11.5, 0.22), (1290, -6, 0.17), (1423, -17, 0.22),
             (1936, -11, .1), (1926, -5.5, 0.16), (2190, -7.5, 0.11), (2530, -14.5, 0.18),
             (2955, -4.5, 0.092), (3478, -12.5, 0.14), (4400, -4.5, 0.12), (4930, -11, 0.15),
             (6550, -12.5, 0.15), (7300, -15, 0.1)]


def pot_knocks():
    """The shell tumbles into the tall pot, whose low modes are driven harder than the bowl's."""
    return knocks(POT_CONTACTS, POT_MODES, ring_db=-6.5, boom_db=18.5, blur=1.22, thud_s=0.064)


def scene():
    """Contacts and water with the walls' answer, over rubbing and hum."""
    hits = bowl_knocks() + pot_knocks()
    water = drips() + glugs()
    answer = kitchen(amp(-5.0) * hits + amp(-4.5) * water)
    return hits + water + answer + drag() + hum()


def record(dry):
    """The phone gives both channels mostly one shared treble, the right ahead by a fifth of a millisecond;
    lower down the right leads near 1.6 kHz and lags near 3 kHz.
    The left port is thin in the bass and full near 4.3 kHz."""
    def share(hz):
        return .6 / (1 + (6200 / (hz + 1)) ** 16)

    def left_tone(hz):
        bass_db = -3 / (1 + (hz / 600) ** 2)
        return amp(bass_db + 2.2 * np.exp(-((hz - 4300) / 900) ** 2))

    def right_phase(hz):
        treble = 2 * np.pi * (hz - 7000) / 4400 / (1 + (5300 / (hz + 1)) ** 24)
        lead = 0.7 * np.exp(-((hz - 1600) / 450) ** 2)
        lag = 0.7 * np.exp(-((hz - 2900) / 650) ** 2)
        return np.exp(1j * (treble + lead - lag))

    def phone_range(hz):
        return 1 / (1 + (hz / 15800) ** 80) / (1 + (36 / (hz + 1)) ** 4)

    blend = filtered(dry, lambda hz: 1 - share(hz)) + filtered(dry.mean(0), share)
    both = np.array([filtered(blend[0], left_tone), filtered(blend[1], right_phase)])
    return filtered(both, phone_range)


dry = scene()
out = record(dry)
master(out)
```